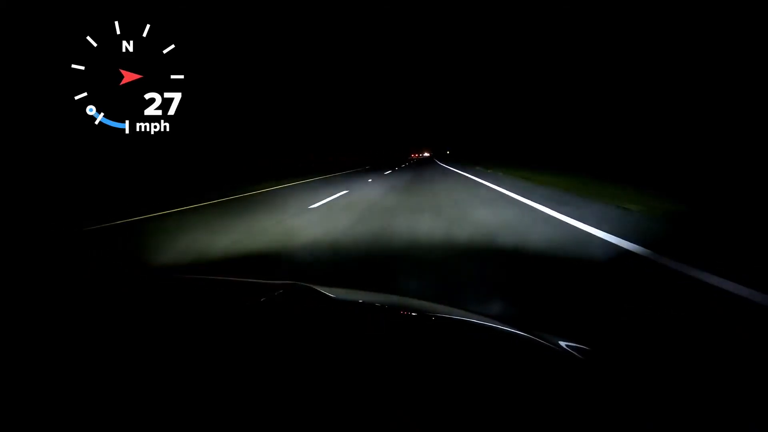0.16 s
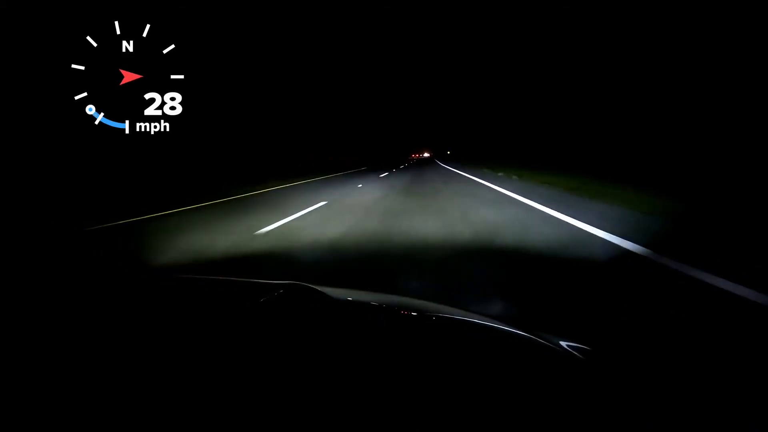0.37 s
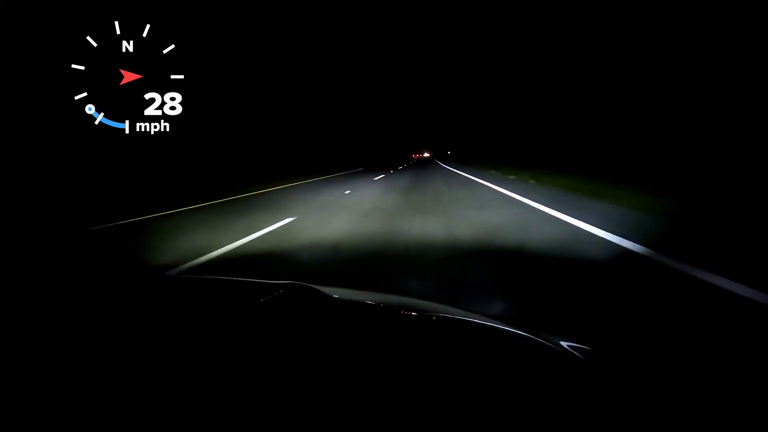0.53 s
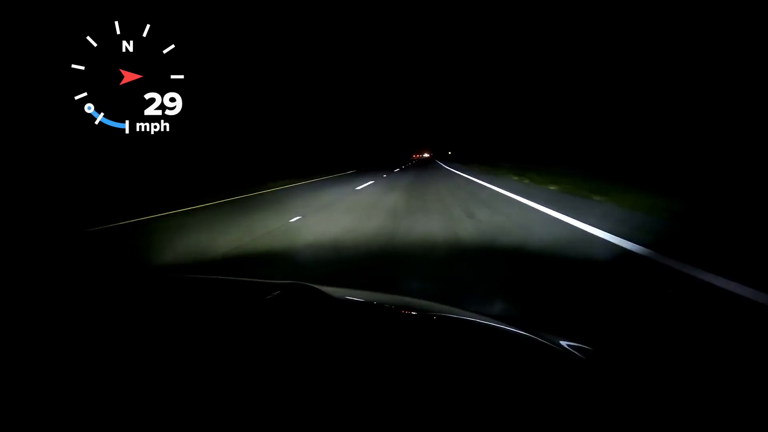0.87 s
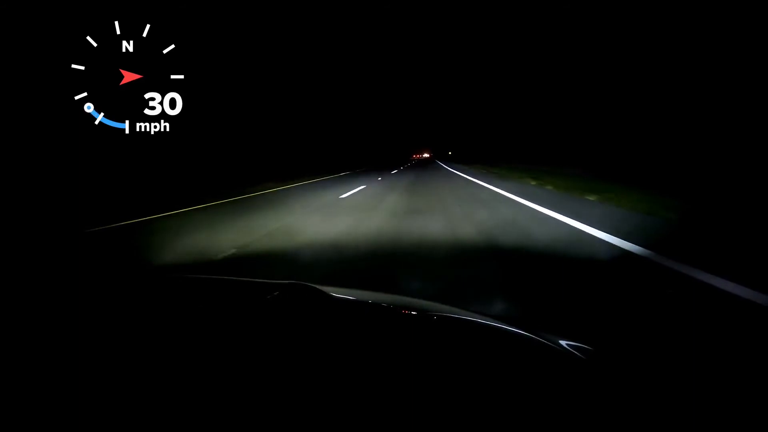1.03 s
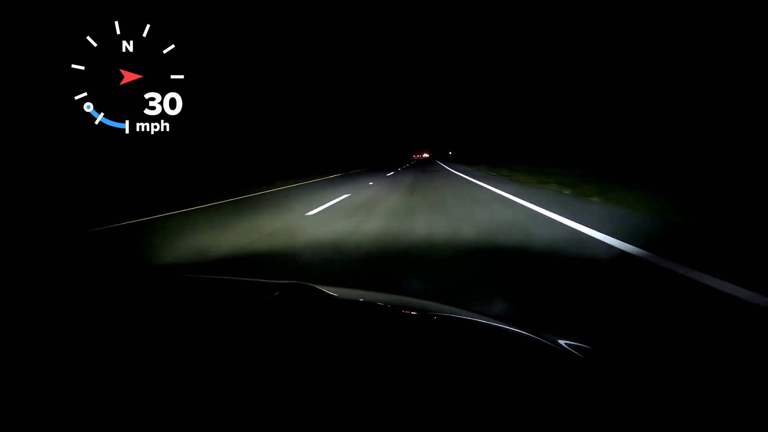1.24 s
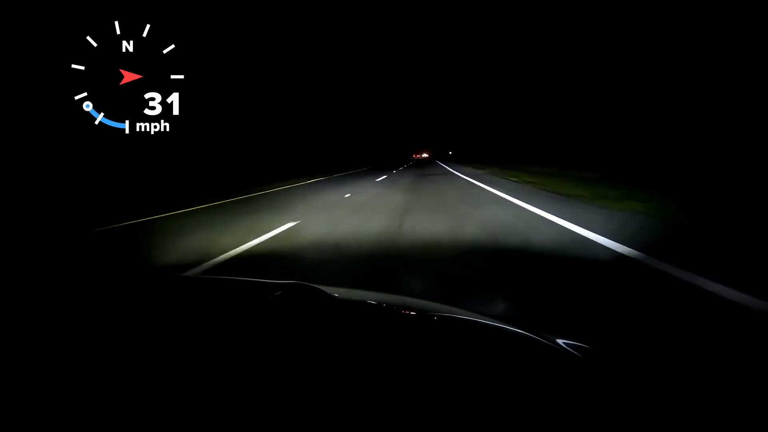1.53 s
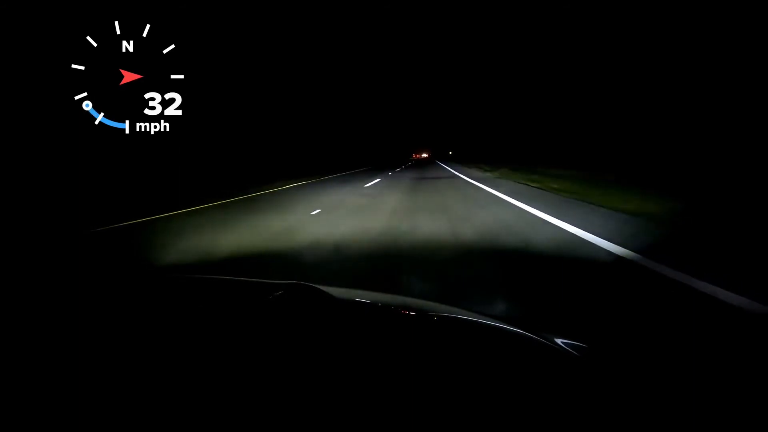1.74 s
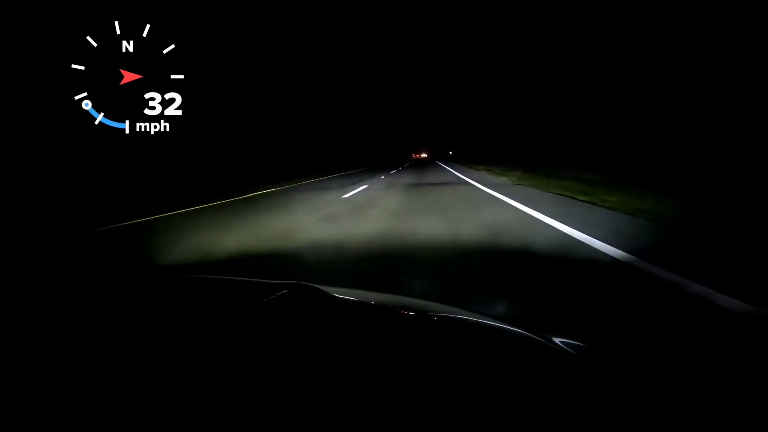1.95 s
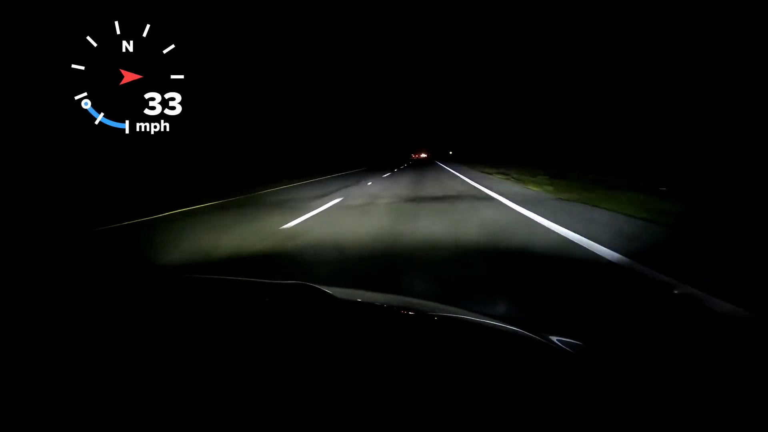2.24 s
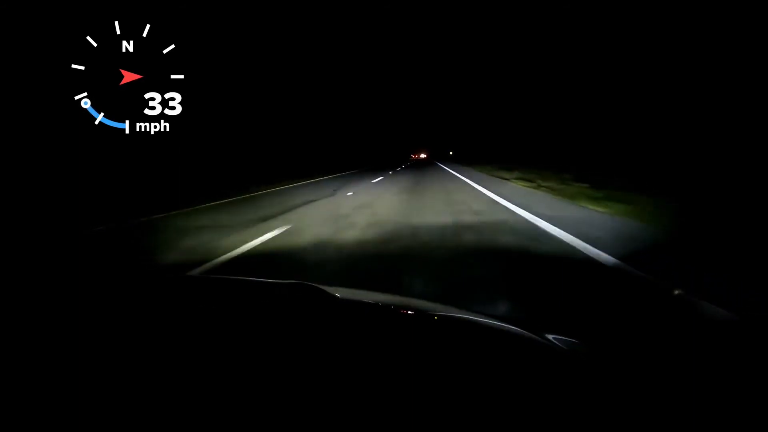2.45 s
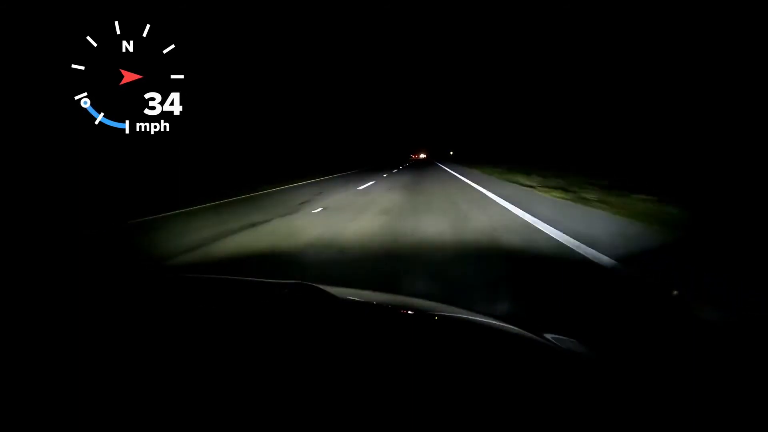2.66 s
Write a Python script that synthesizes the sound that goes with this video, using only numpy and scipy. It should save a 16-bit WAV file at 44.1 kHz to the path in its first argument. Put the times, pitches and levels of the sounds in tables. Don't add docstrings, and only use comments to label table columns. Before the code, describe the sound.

A deep engine boom fills a car cabin, its pitch creeping upward over dull tyre rumble, roar and light hiss, with very faint high whines. Soft low thuds come near 0.7, 1.5 and 2.1 seconds. From about 2 seconds the floor drones on coarser road; around 2.35-2.4 a hard joint knocks, the engine eases and the road noise briefly ducks, then recovers, fuller, with softer bumps near 2.6 and 2.7.

```python
import sys
import numpy as np
from scipy import signal
from scipy.io import wavfile
from scipy.ndimage import uniform_filter1d

SR = 44100
rng = np.random.default_rng(int(sys.argv[2]) if len(sys.argv) > 2 else 0)


def linear_from_db(decibels):
    return 10 ** (np.asarray(decibels, float) / 20)


def master_out(mix):
    frames = np.transpose(np.atleast_2d(mix))
    ceiling = np.clip(frames, -1, 1)
    pcm = np.round(ceiling * 32767).astype(np.int16)
    wavfile.write(sys.argv[1], SR, pcm)


N = 123480
T = np.arange(N) / SR

# start_s, firing_rate_hz, load_db
ENGINE = [(0.028, 51.31, -15.5), (0.629, 54.21, -18), (1.101, 56.02, -17.5), (1.662, 58.7, -16),
          (2.1, 61.15, -16.5), (2.32, 62.33, -16.5), (2.351, 61.6, -28.5), (2.41, 63.37, -33.5),
          (2.439, 63.56, -24), (2.55, 63.13, -17.5), (2.77, 63.2, -20.5)]
# multiple of the firing pattern rate, level_db under the load
ORDERS = [(1, -13.5), (2, 2), (3, -4.5), (4, -5.5), (5, -22.5), (6, -24), (7, -26), (8, -28.5)]
# frequency_hz, gain_db
CABIN = [(52, -4.5), (64, 1.5), (140, -3.5), (163, 3), (190, -6), (208, -5), (227, 2), (250, -3.5)]
# frequency_hz, density_db
RUMBLE = [(18, -5.5), (35, -1.5), (60, -1), (85, -2.5), (140, -2.5), (205, -4.5), (270, -8.5), (400, -33)]
# frequency_hz, density_db
ROAR = [(150, -29.5), (260, -3.5), (273, -5.5), (397, -9.5), (442, -10.5), (601, -8.5), (1030, -19),
        (2190, -31), (2600, -36.5), (3380, -59), (5720, -120)]
# frequency_hz, density_db
HISS = [(1000, -34), (1700, -1.5), (2190, -2), (2510, -6), (2950, -4.5), (4520, -12), (5350, -11.5),
        (8690, -28), (13000, -53), (16800, -88.5), (22000, -120)]
# start_s, effort_db
ROAD = [
    (0.03, -46),
    (1.41, -43),
    (2.32, -38.5),
    (2.35, -39.5),
]
# start_s, effort_db
ROAD_END = (4.2, -37.5)
# pitch_hz, width_hz, level_db
PANELS = [(400, 24, -42), (597, 69, -44.5), (829.7, 14, -46.5), (1215, 120, -48), (2240, 280, -57.5)]
# pitch_hz, width_hz, level_db
WHINES = [(4722, 30, -67), (5213, 25, -73), (5405, 30, -68)]
# deepest_push_s, level_db, body_pitch_hz, spread_s
BUMPS = [(.73, -24, 62, .03), (1.54, -24, 52, .03), (2.125, -23, 35, .03), (2.3305, -18, 40, .014),
         (2.353, -9, 80, .006), (2.383, -8, 120, .003), (2.4006, -8, 205, .008), (2.4075, -12, 70, .01),
         (2.427, -14, 120, .008), (2.585, -21, 58, .03), (2.72, -23, 62, .05)]

START_TURNS = 0.55
SMEAR_RAD, SMEAR_MID_ORDER = 0.85, 2.7
WAVER_DB, WAVER_PER_S = 0.52, 11
EASE_S, EASE_DB = 2.42, -8.5
ROAD_MID_DB = -42.5
RUMBLE_DB, ROAR_DB, HISS_DB = -27, -29.5, -45
RUMBLE_SHARE, ROAR_SHARE, HISS_SHARE = 0.81, 0.95, 1.01
PAN_HZ, PAN_WIDTH_HZ, PAN_DB = 207.4, 25, -36
COARSE_S, COARSE_DB = 2.0, 8.5
DUCK_FROM_S, DUCK_DB, DUCK_FALL_S, DUCK_BACK_S = 2.394, -5.5, 0.0062, 0.065


def unit_rms(x):
    return x / np.sqrt(np.mean(x ** 2) + 1e-20)


def response(points, hz):
    point_hz, level_db = np.transpose(points)
    return np.interp(np.log(hz + 1), np.log(point_hz + 1), level_db)


def slow_drift(top_per_s):
    drift = 0
    for rate_hz in np.geomspace(1, top_per_s, num=20):
        drift = drift + np.sin(2 * np.pi * (rate_hz * T + rng.random())) / np.sqrt(rate_hz)
    return unit_rms(drift)


def engine():
    start_s, rate_hz, load_db = np.transpose(ENGINE)
    firing_hz = uniform_filter1d(np.interp(T, start_s, rate_hz), size=4000)
    turns = START_TURNS + np.cumsum(firing_hz) / SR
    eased_db = EASE_DB / (1 + np.exp(-(T - EASE_S) / 0.017))
    boom = 0
    for order, order_db in ORDERS:
        waver_db = WAVER_DB * abs(order - 2) ** 0.5 * slow_drift(WAVER_PER_S)
        level_db = order_db + eased_db * (order > 2) + response(CABIN, order * firing_hz) + waver_db
        smear_rad = SMEAR_RAD * (order - SMEAR_MID_ORDER) ** 2
        boom = boom + linear_from_db(level_db) * np.cos(2 * np.pi * order * turns - smear_rad)
    return np.sqrt(2) * linear_from_db(np.interp(T, start_s, load_db)) * boom


def coloured_noise(colour, patchy_db, edge_db, size=2048):
    frames, hz = 4 * N // size + 5, np.fft.rfftfreq(size, 1 / SR)
    real, imaginary, patches = rng.standard_normal((frames, len(hz), 3)).T
    patches = uniform_filter1d(patches, size=16, axis=0)
    patches = unit_rms(uniform_filter1d(patches, size=6, axis=1))
    octaves_below = np.maximum(np.log2(colour[0][0] / (hz + 1)), 0)
    octaves_above = np.maximum(np.log2((hz + 1) / colour[-1][0]), 0)
    colour_db = response(colour, hz) - edge_db * (octaves_below + octaves_above)
    spectra = (real + 1j * imaginary) * linear_from_db(colour_db[:, None] + patchy_db * patches)
    return unit_rms(signal.istft(spectra, nperseg=size, noverlap=3 * size // 4)[1][:N])


def resonance(hz, width_hz):
    carrier = np.exp(2j * np.pi * hz * T)
    decay = np.exp(-np.pi * width_hz / SR)
    envelope = rng.standard_normal(N) / carrier
    for _ in range(2):
        envelope = signal.lfilter([1], [1, -decay], envelope)
    return unit_rms((carrier * envelope).real)


def road():
    effort_db = np.interp(T, *np.transpose(list(ROAD) + [ROAD_END])) - ROAD_MID_DB
    rumble_db = RUMBLE_DB + RUMBLE_SHARE * effort_db + 0.5 * slow_drift(5.5)
    rumble = linear_from_db(rumble_db) * coloured_noise(RUMBLE, patchy_db=-2.0, edge_db=21, size=4096)
    panels = sum(linear_from_db(level_db) * resonance(hz, width_hz) for hz, width_hz, level_db in PANELS)
    tread = linear_from_db(ROAR_DB) * coloured_noise(ROAR, patchy_db=0.1, edge_db=13.5)
    roar = linear_from_db(ROAR_SHARE * effort_db) * (tread + panels)
    hiss_db = HISS_DB + HISS_SHARE * effort_db + 0.6 * slow_drift(40)
    hiss = linear_from_db(hiss_db) * coloured_noise(HISS, patchy_db=0.8, edge_db=29.5, size=1024)
    return rumble + roar + hiss


def whines():
    return sum(linear_from_db(level_db) * resonance(hz, width_hz) for hz, width_hz, level_db in WHINES)


def bumps():
    push = 0
    for deepest_s, level_db, hz, spread_s in BUMPS:
        since = T - deepest_s
        push = push + linear_from_db(level_db) * np.exp(-(since / spread_s) ** 2) * np.cos(2 * np.pi * hz * since)
    return -push


def floor_pan():
    coarse = 1 / (1 + np.exp(-(T - COARSE_S) / 0.08))
    return linear_from_db(PAN_DB + COARSE_DB * coarse) * resonance(PAN_HZ, PAN_WIDTH_HZ)


def gain_duck():
    since = np.maximum(T - DUCK_FROM_S, 0)
    fall = 1 - np.exp(-since / DUCK_FALL_S)
    recovery = np.exp(-(since / DUCK_BACK_S) ** 2)
    return linear_from_db(DUCK_DB * fall * recovery)


def scene():
    steady = gain_duck() * (road() + whines())
    return (engine() + steady + bumps() + floor_pan())[None]


def low_pass(x):
    return signal.sosfilt(signal.butter(12, 13110, fs=SR, output="sos"), x)


def record(dry):
    soft = np.tanh(dry)
    finished = soft - uniform_filter1d(soft, size=8000)
    return low_pass(finished)


dry = scene()
out = record(dry)
master_out(out)
```